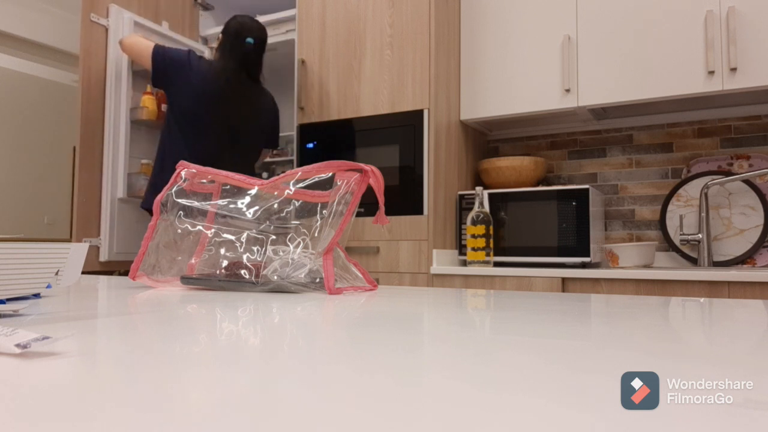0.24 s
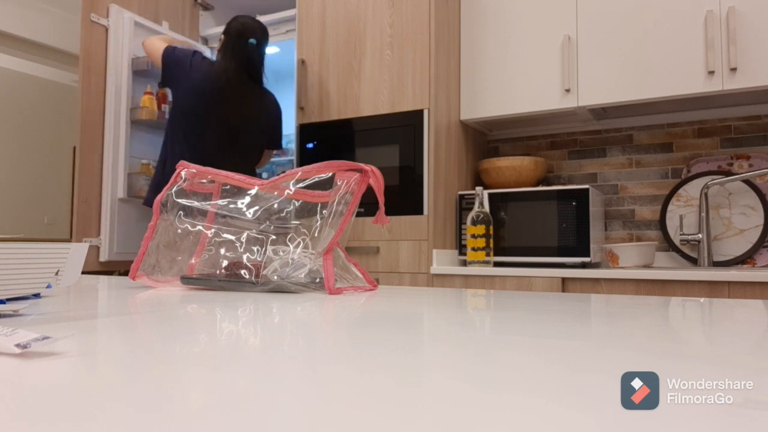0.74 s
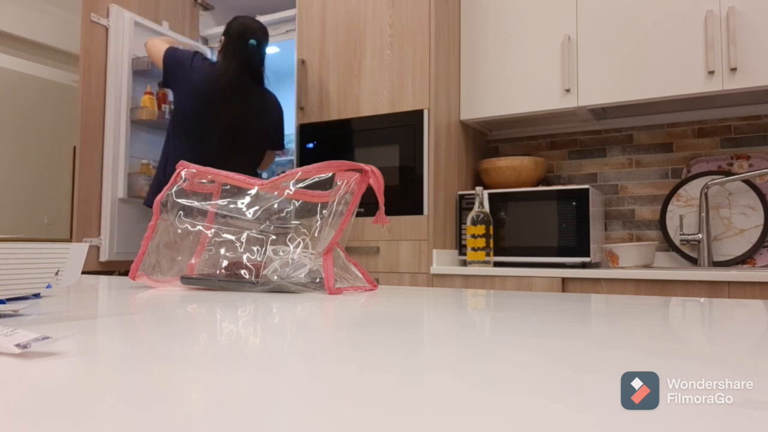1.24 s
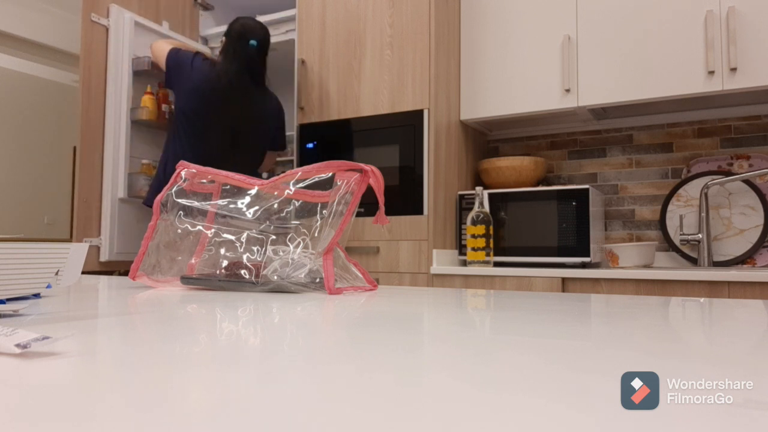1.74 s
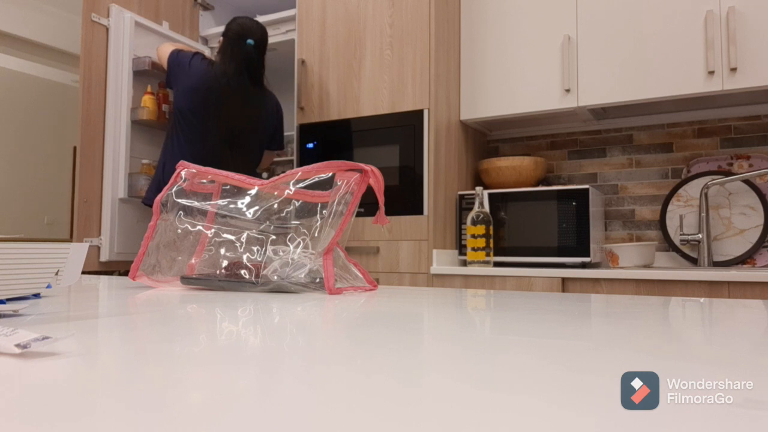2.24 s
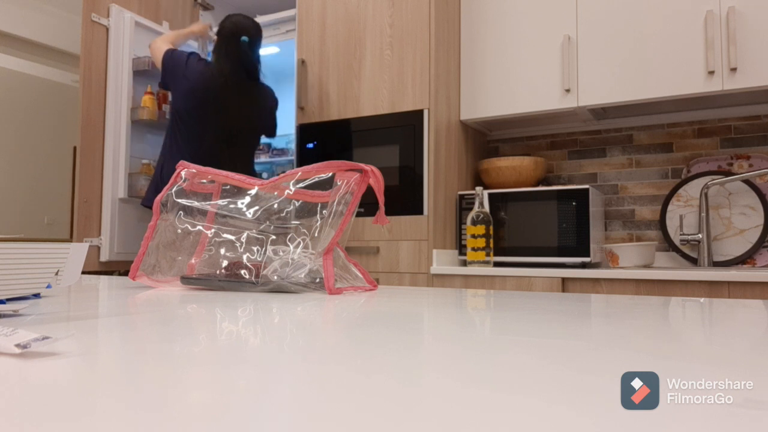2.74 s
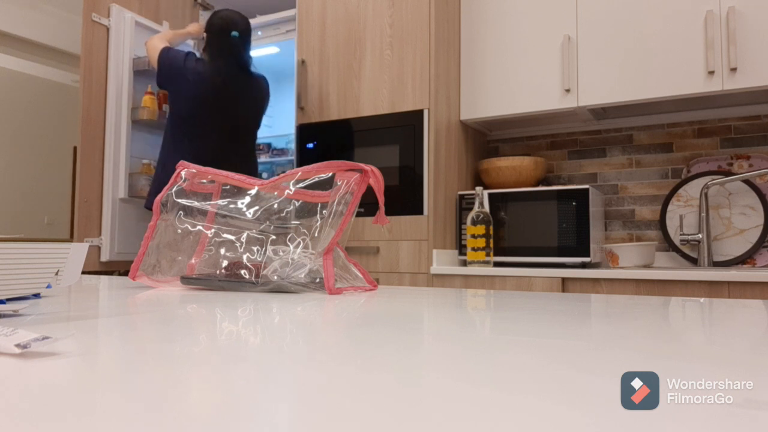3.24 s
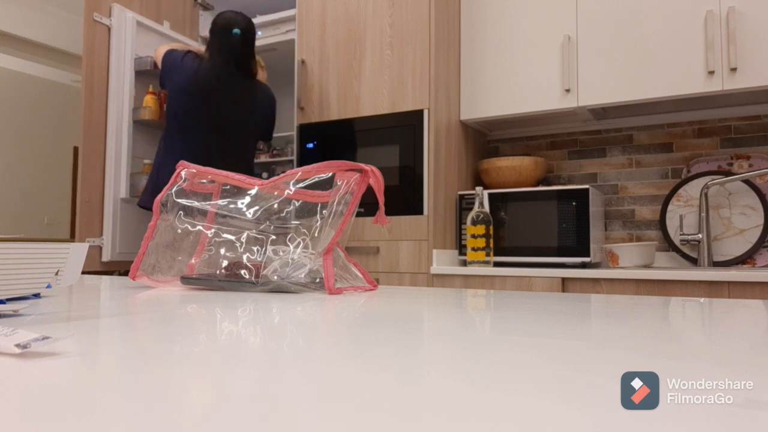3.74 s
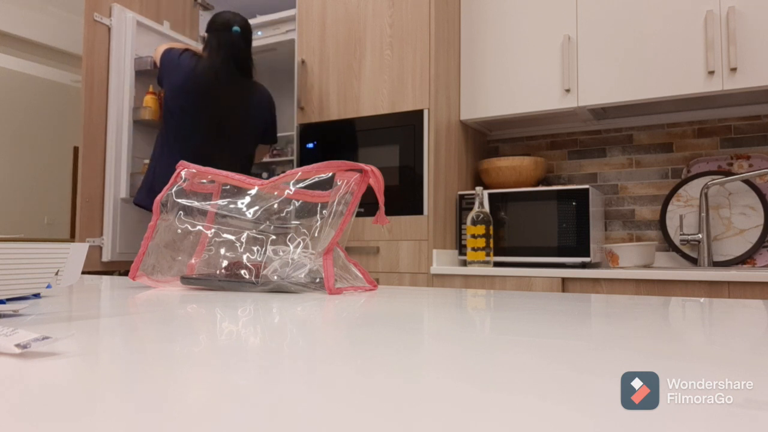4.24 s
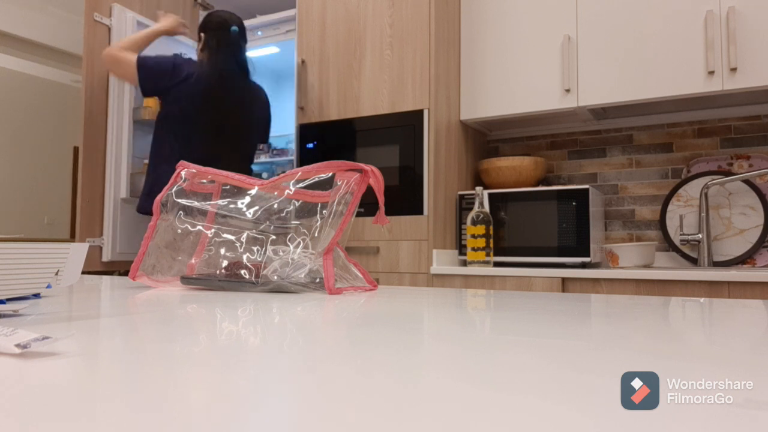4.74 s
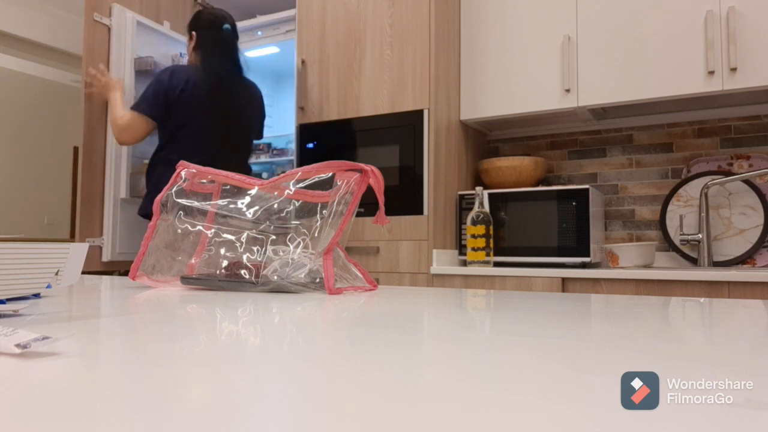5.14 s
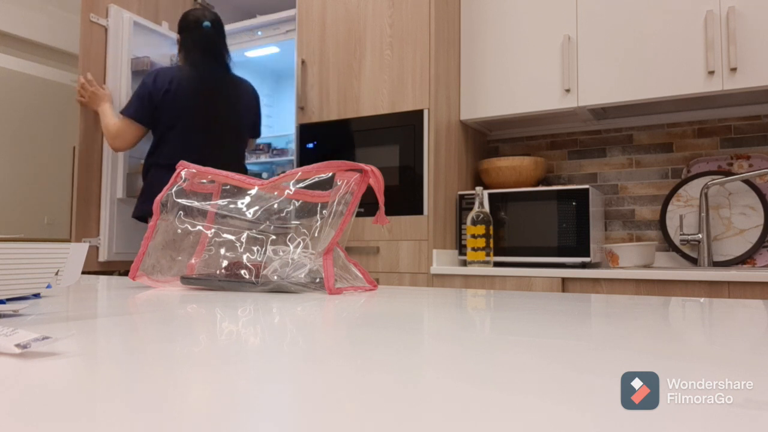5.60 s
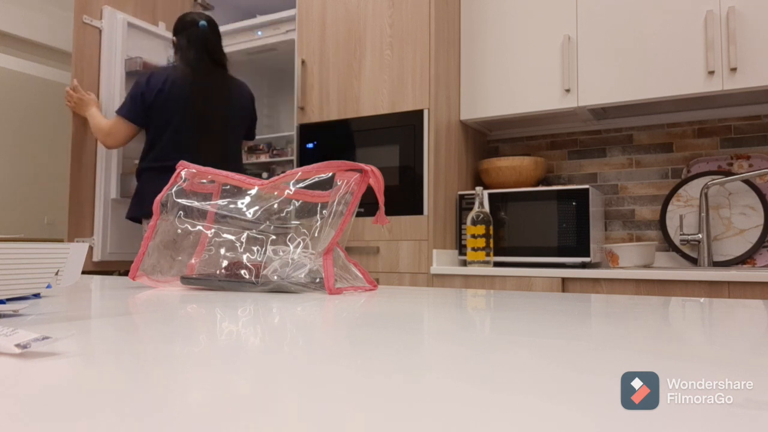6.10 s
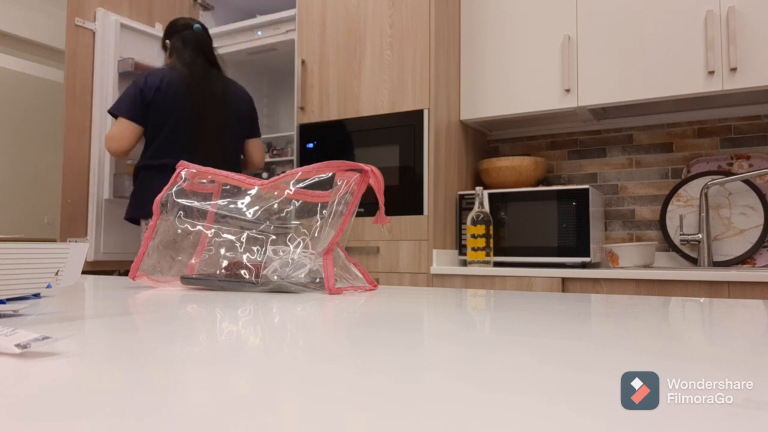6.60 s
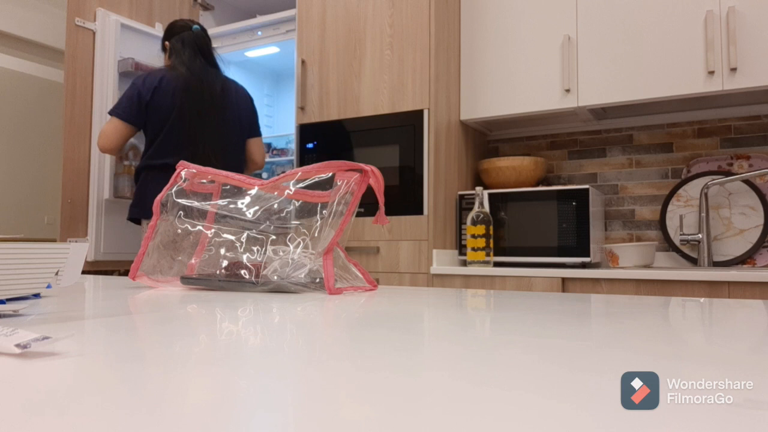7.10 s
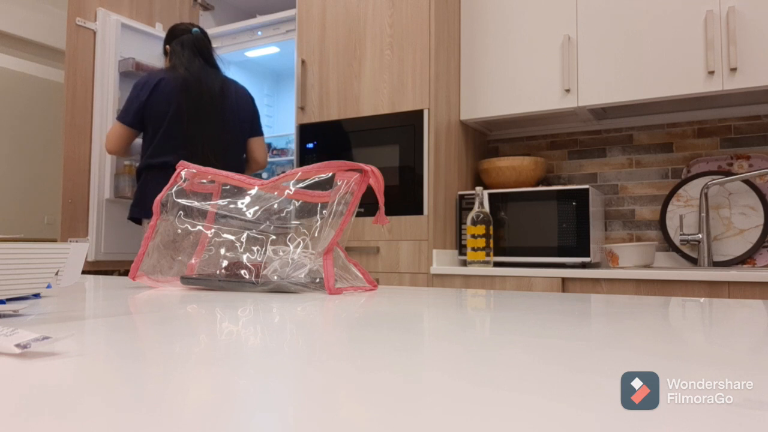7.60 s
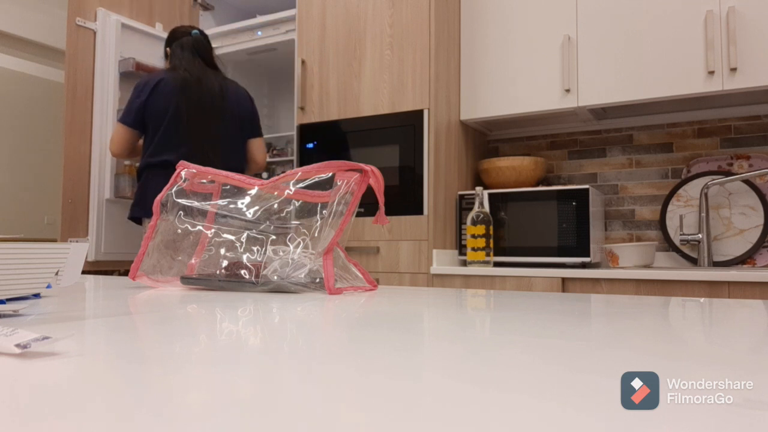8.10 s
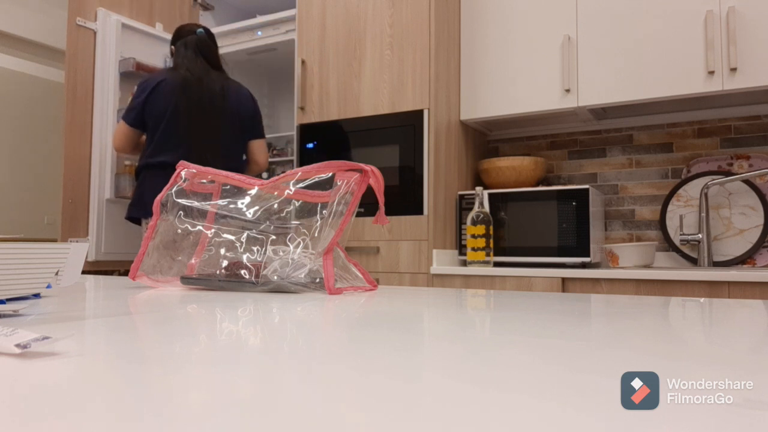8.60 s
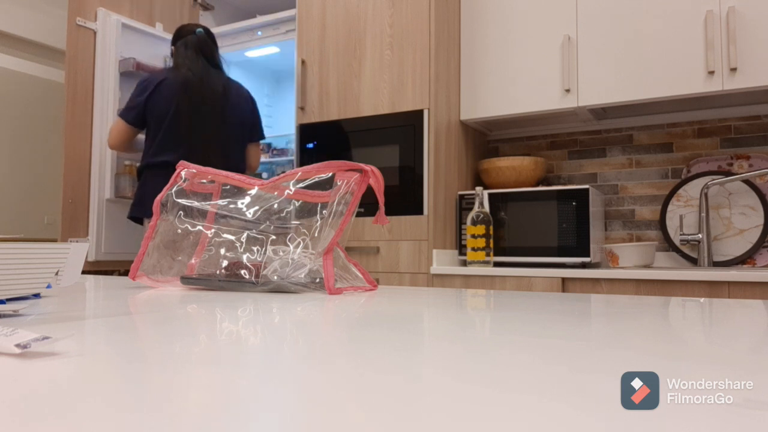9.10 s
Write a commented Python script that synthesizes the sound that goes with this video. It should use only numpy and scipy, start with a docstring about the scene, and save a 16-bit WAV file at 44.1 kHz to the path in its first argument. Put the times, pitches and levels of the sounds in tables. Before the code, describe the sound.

In a hard-walled home kitchen, someone rummages in an open refrigerator a few metres from the microphone. A dense clatter of plastic tubs, cartons and bottles fills the first two seconds, with thin plastic snaps and a brief squeak. Jars then clink and scrape, followed by scattered hollow knocks, a soft rustly pouch, a strong double thump late on and a final bottle knock. Room echo surrounds it all, over a very faint low compressor hum.

```python
"""A quick clatter of tubs, cartons and bottles is heard first, then sparser knocks and short scrapes over a faint hum:
someone rearranges an open refrigerator a few metres away across a hard-walled kitchen.
Knocks and slides are bursts of tiny impacts filtered by container, plastic shelf and cabinet resonances.
Two glass jars clink through damped modes, thin plastic snaps, and stuck plastic squeaks on a rising note.
Most of the sound arrives by way of the room's reverberation; compressor lines and low room noise lie beneath."""
import sys
import numpy as np
from scipy import signal
from scipy.fft import rfft, irfft, next_fast_len
from scipy.io import wavfile
from scipy.ndimage import uniform_filter1d, map_coordinates

SR = 44100
rng = np.random.default_rng(int(sys.argv[2]) if len(sys.argv) > 2 else 0)


def persist_wave(psi):
    """Save psi, clipped to +-1, as 16-bit WAV."""
    counts = np.round(np.clip(psi, -1, 1) * 32767).astype(np.int16)
    wavfile.write(sys.argv[1], SR, np.atleast_2d(counts).T)


N = 412335
BLOCK = 16384   # samples in one contact's filter


def knocks(graze_share=.4):
    """Impact excitation: each container grazes, then lands with its own force and hardness."""
    # containers set down or bumped: [t/s, container, force/dB, hardness/dB, settling/s]
    impacts = [ (.001, "tub", 7.5, 1, 0.0022), (0.135, "tub", 2.5, -7, 0.0039),
               (.316, "tray", 5.5, -8, 0.0037), (0.427, "tub", 20, 0.5, 0.0044),
               (.616, "rack", 11.5, 12, .003), (.632, "carton", 18.5, 5, 0.005), (.670, "tub", 18, 2, .002),
               (.984, "bottle", 17, 11.5, 0.0072), (1.004, "punnet", 24, -1.5, .005),
               (1.087, "carton", 15.5, 7, 0.0071), (1.101, "punnet", 17.5, -11.5, 0.006),
               (1.202, "tub", 19, 1, 0.0064), (1.237, "tub", 18, -4.5, 0.0063),
               (1.313, "tub", 13.5, -2.5, 0.0042), (1.505, "box", 3, 7.5, 0.0024),
               (1.549, "carton", 15, -21, 0.0031), (1.581, "carton", 8, 15, 0.0078),
               (1.639, "tub", 14, 5, .004), (1.656, "carton", 7.5, -16, 0.0029),
               (2.008, "jar", -2.5, -3.5, 0.0078), (2.034, "jar", 3.5, 5.5, 0.012),
               (2.083, "jar", 14.5, 5, .0016), (2.407, "jar", 4, -8, 0.0017),
               (2.552, "lid", -1, 5, 0.00282), (2.573, "lid", 0, 0, 0.0035), (2.637, "box", 1, 12.5, .002),
               (2.917, "lid", -7.5, -4.5, .005), (3.134, "carton", 5.5, -1, 0.0063),
               (3.525, "jar", -15.5, 8.5, 0.016), (3.761, "jar", 7, -13, 0.0085),
               (4.023, "jar", -1.5, 2, 0.0053), (4.174, "rack", -4, -7.5, 0.0046),
               (4.208, "box", -8.5, 14, 0.0099), (4.358, "punnet", 16.5, -0.5, .011),
               (4.551, "jar", 7.5, -0.5, 0.00216), (4.965, "tub", 2, -0.5, .011),
               (5.045, "bottle", 14, 10.5, 0.0053), (5.118, "tub", 5, -14, 0.0034),
               (5.197, "punnet", 3, -3.5, 0.0061), (5.319, "tub", 3.5, -2, 0.0049),
               (5.668, "bottle", 11, 3.5, 0.01), (5.739, "box", 7.5, -1.5, 0.0058),
               (5.787, "tub", 16.5, 9, 0.0047), (6.172, "rack", -3.5, 0.5, 0.0059),
               (7.049, "pouch", 5, 1.5, 0.016), (7.081, "pouch", 5, 0, 0.0047),
               (7.566, "tub", 7, 3.5, 0.011), (7.696, "pot", 25, -10, 0.0068),
               (7.743, "box", 24.5, -1, .01), (8.197, "box", 7.5, -13, .007),
               (8.53, "jar", -17, -20.5, .005), (8.637, "bottle", -15.5, -24.5, 0.0044),
               (9.159, "punnet", -3.5, -1, 0.0099), (9.233, "bottle", 15.5, 7.5, 0.012)]
    out = np.zeros(N)
    for s, container, force_db, hardness_db, settling in impacts:
        sound = contact(chatter(settling), container, force_db, hardness_db)
        add(out, s - graze_share * settling, sound)
    return out


def slides(slips_per_s=900, uneven_db=5):
    """Stick-slip friction: dense random clicks swell and fade as a container is pushed along."""
    # containers dragged along a shelf: [middle t/s, container, force/dB, hardness/dB, length/s]
    drags = [ (.386, "tray", -2, -1.5, 0.12), (.582, "rack", 6, 8, 0.094), (.897, "tub", -1.5, 14.5, 0.075),
             (.956, "box", 8, -1, 0.085), (1.35, "tub", 4, -9, 0.079), (2.37, "jar", -0.5, -1, 0.087),
             (3.02, "jar", -8.5, 9, 0.17), (3.105, "jar", -3, 17.5, 0.088),
             (3.199, "carton", -9.5, 26.5, 0.096), (3.858, "jar", -1, 7.5, .12),
             (4.323, "jar", -5.5, 10.5, 0.14), (4.471, "tub", 6.5, 4.5, .09), (4.883, "box", -14, 3, 0.13),
             (5.386, "tub", -1.5, 4, 0.1), (6.902, "pouch", -8.5, -8, .13),
             (7.001, "pouch", -12.5, -3, .13), (7.171, "pouch", -2, -9.5, .13),
             (8.84, "tub", -10, -17, 0.15)]
    out = np.zeros(N)
    for s, container, force_db, hardness_db, length in drags:
        size = int(length * SR)
        slips = rng.random(BLOCK) < slips_per_s / SR
        strength = rng.choice([-1, 1], BLOCK) * from_db(uneven_db * rng.standard_normal(BLOCK))
        clicks = (slips * strength)[:size]
        force = unit_energy(clicks * np.sqrt(np.hanning(size)))
        add(out, s - size / SR / 2, contact(force, container, force_db, hardness_db))
    return out


def nudges(count=44, force_db=-23, spread_db=2.0, hardness_db=-12, settling=0.028):
    """Weak, soft impacts: all the while the searching hand brushes against one container or another."""
    out = np.zeros(N)
    for k in range(count):
        s = (k + rng.random()) / count * (N - 1) / SR   # somewhere in the k-th equal slot
        container = rng.choice(["carton", "bottle", "box"])
        nudge_db = force_db + spread_db * rng.standard_normal()
        add(out, s, contact(chatter(settling), container, nudge_db, hardness_db))
    return out


def chatter(settling, uneven_db=5):
    """Broadband excitation: a quick flurry of uneven tiny impacts that excites all pitches alike."""
    age = np.arange(BLOCK // 2) / SR / settling
    swell = age * np.exp(-age)
    flurry = rng.standard_normal(len(age)) * from_db(uneven_db * rng.standard_normal(len(age)))
    for _ in range(2):   # shape in time, then flatten the spectrum
        spectrum = rfft(flurry * swell, BLOCK)
        flurry = irfft(spectrum / np.abs(spectrum))[:len(age)]
    return unit_energy(flurry * swell ** .25)


def contact(force, container, force_db, hardness_db):
    """Source-filter principle: a container has its own thud and hollow note; hardness adds clack and tick."""
    # what is handled, by name: [hollow note f/Hz, note over the rest/dB, thud/dB, clack/dB, tick/dB]
    containers = { "carton": (316.5, 8, -1.5, -14.5, -37), "tray": (1450, 8, 5, -4.5, -37),
                  "pouch": (403.5, 10.5, -1, -17.5, -33), "bottle": (437.5, 9, -5.5, -9.5, -35.5),
                  "tub": (557.5, 9, 0.5, -9.5, -31), "box": (699, 6.5, -1, -9.5, -30.5),
                  "jar": (806, 8.5, -9, -6.5, -26.5), "punnet": (590, 10, -15, -9, -27.5),
                  "pot": (960, 8.5, -1.5, 1, -9.5), "lid": (1323.5, 12.5, -18.5, -9.5, -27),
                  "rack": (2150, 4.5, -12, -5, -31.5)}
    # colour of a contact on plastic shelving: [f/Hz, level/dB]
    shelf_colour = [(30, -18.5), (60, -9), (100, -4.5), (170, -1.5), (280, -3), (600, 0.5), (1000, -1),
                    (1500, 1), (2400, -5.5), (3200, -7), (5000, 3), (8000, -3), (13000, -7.5),
                    (16000, -9.5)]
    note_hz, note_db, thud_db, clack_db, tick_db = containers[container]
    clack_db = clack_db + 0.45 * hardness_db   # the clack takes a share of the hardness
    tick_db = tick_db + hardness_db            # the tick takes all of it
    hz = np.fft.rfftfreq(BLOCK, 1 / SR)
    tone = [(190, thud_db), (380, 0.012), (950, 0.017), (1700, clack_db), (2700, clack_db), (5000, tick_db)]
    note_width_hz = 55.5 + 0.07 * note_hz
    detuning = 2 * (hz - note_hz) / note_width_hz
    hollow_db = 10 * np.log10(1 + (from_db(note_db) ** 2 - 1) / (1 + detuning ** 2))
    level_db = force_db + at_hz(tone, hz) + at_hz(shelf_colour, hz) + hollow_db + wall_modes(hz)
    return coloured(force, level_db)


def wall_modes(hz, spacing_hz=90):
    """Modal scatter: random peaks and dips in dB above 450 Hz for the walls' damped resonances."""
    depth_db = at_hz([(450, 0), (900, 3), (4000, 2.5), (9000, 1.5)], hz)
    return depth_db * map_coordinates(rng.standard_normal(BLOCK), [hz / spacing_hz], order=1)


def cabinet(force, ring_db=2):
    """Sympathetic resonance: every contact also sets the shelves and the cabinet ringing."""
    # resonances of cabinet, shelves and racks: [f/Hz, width/Hz, level before ring_db/dB]
    cabinet_modes = [(100.3, 2.4, 9.5), (152, 25, -3), (264, 3, -2.5), (316, 23, 3.5), (452.7, 6.6, -2.5),
                     (563.7, 6.6, 0.5), (700, 13, -3), (815, 29, -9), (890, 11, -9), (1083, 25, -3),
                     (1204, 21, -6), (1560, 2.2, -10.5), (2040, 95, -11.5), (2270, 22, -3), (2473, 5.7, -5)]
    return force + from_db(ring_db) * resonate(force, cabinet_modes)


def clinks():
    """Modal ringing: jars grate in short flurries; their contents damp all but one glass mode."""
    # jar grating against jar: [t/s, force/dB, settling/s]
    gratings = [(2.424, 0, 0.0097), (2.445, -13, 0.003), (2.485, -16, 0.01)]
    # ring of the glass: [f/Hz, width/Hz, level/dB]
    glass_modes = [(1650, 28, 12), (1790, 57, 13), (1870, 94, 17), (2700, 74, 0), (3350, 59, 3),
                   (4160, 210, 4), (4430, 4.5, 17), (4490, 53, 15.5), (5850, 300, -1.5), (6260, 26, 5),
                   (7580, 940, -4.5), (8200, 54, 1), (9230, 96, 1), (10800, 1100, -7.5), (11900, 670, -3),
                   (14400, 1000, -14)]
    return resonate(flurries(gratings), glass_modes)


def snaps(edge_hz=10000):
    """High-pass radiation: flexing film and thin tub walls crackle only at the very top of the treble."""
    # thin plastic snapping under the fingers: [t/s, force before the high-pass/dB, settling/s]
    flexings = [(0.424, -29, 0.0036), (0.617, -17.5, 0.0075), (0.905, -16.5, 0.009), (0.979, -2, 0.0037),
                (1.194, -15.5, 0.0031), (1.427, -26, 0.0023), (1.634, -12, 0.0012), (6.91, -36, 0.0072)]
    high_pass = signal.butter(2, edge_hz, "high", fs=SR, output="sos")
    return signal.sosfilt(high_pass, flurries(flexings) + 1e-18)


def squeaks(width_hz=260, rise=1.25):
    """Frictional oscillation: sticking plastic gives a rough note that rises as the pull speeds up."""
    # plastic pulled free of a rack: [start t/s, length/s, first pitch f/Hz, force/dB]
    pulls = [(0.552, 0.065, 2350, -18), (2.935, 0.17, 1950, -26.5)]
    out = np.zeros(N)
    low_pass = signal.butter(2, width_hz / 2, fs=SR, output="sos")
    for s, length, hz, force_db in pulls:
        size = int(length * SR)
        phase = 2 * np.pi * np.cumsum(np.linspace(hz, rise * hz, size)) / SR
        grip = signal.sosfilt(low_pass, rng.standard_normal(BLOCK))[-size:]   # slow noise roughens the note
        squeak = unit_energy(grip * np.sin(phase) * np.sqrt(np.hanning(size)))
        add(out, s, from_db(force_db) * squeak)
    return out


def kitchen(x, early_t60=0.29, build_s=0.0029, build_cycles=0.37, right_db=-1, lag_s=0.00013):
    """Room impulse response: direct sound from the left, early reflections off counter and cupboards, tail."""
    # reverberation time: [f/Hz, t60/s]
    room_t60 = [(60, 0.65), (150, .75), (300, 0.77), (700, 0.91), (1500, 0.65), (2500, 0.65), (5000, 0.58),
                (8000, 0.6), (14000, 0.15)]
    # early reflections over the start of the tail: [f/Hz, level/dB]
    early_colour = [(100, -8), (250, 6), (600, 10.5), (2000, 0.5), (6000, 4), (13000, 6.5)]
    # direct sound re the whole reverberation, before evening: [f/Hz, level/dB]
    direct_colour = [(100, -14.5), (300, -12), (700, -5), (2500, -7.5), (7000, -5), (13000, -11.5)]
    t, response = np.arange(SR) / SR, 0
    for hz, band in diffuse_bands(SR):
        tail = from_db(-60 * t / at_hz(room_t60, hz))
        early = from_db(at_hz(early_colour, hz) - 60 * t / early_t60)
        build = 1 - np.exp(-t / (build_s + build_cycles / hz))   # low notes fill the room more slowly
        response = response + band * unit_energy(np.hypot(tail, early) * build)
    response = unit_energy(response)
    direct = coloured(np.ones(1), at_hz(direct_colour, np.fft.rfftfreq(BLOCK, 1 / SR)))
    add(response[0], 0, direct)
    add(response[1], lag_s, from_db(right_db) * direct)
    return signal.oaconvolve(x[None], evened(response), axes=1)[:, :N]


def evened(response, width_bins=50):
    """Spectral smoothing: level out a stereo response's broad humps, keep its fine resonances."""
    spectrum = rfft(response, 2 * SR)   # bins 0.5 Hz apart
    power = uniform_filter1d(np.mean(np.abs(spectrum) ** 2, axis=0), width_bins)
    return irfft(spectrum / np.sqrt(power + 1e-12))[:, :SR]


def diffuse_bands(size):
    """Diffuse-field coherence: half-octave bands of partly alike stereo noise, as (Hz, band)."""
    # likeness of the two channels, clipped to +-0.99: [f/Hz, correlation -1..1]
    likeness = [(60, 1), (150, 0.94), (300, 0.84), (550, 0.66), (1000, 0), (2000, 0), (5000, 0.037),
                (14000, 0)]
    # left minus right: [f/Hz, level/dB]
    lean = [(50, 13.5), (130, 9.5), (260, 5), (550, 6.5), (1000, 2), (2000, 6.5), (4000, 2), (14000, 1.9)]
    hz = np.fft.rfftfreq(size, 1 / SR)
    mid, side = rfft(rng.standard_normal((2, size)))
    alike = np.clip(at_hz(likeness, hz), -.99, .99)
    sign = np.array([[1], [-1]])   # left, right
    field = (np.sqrt(1 + alike) * mid + sign * np.sqrt(1 - alike) * side) / np.sqrt(2)
    field = field * from_db(sign * at_hz(lean, hz) / 2)
    centres = 22 * 2 ** (np.arange(20) / 2)
    for centre, one_band in zip(centres, np.eye(len(centres))):
        yield centre, irfft(field * at_hz(np.c_[centres, one_band], hz), size)


def background(air_db=-63.5, hum_lean_db=3):
    """Stationary noise and steady sinusoids: low room noise and the lines of the compressor."""
    # spectral shape of the still kitchen, whose rms is then set to air_db: [f/Hz, relative level/dB]
    air_colour = [(22, -43.5), (32, -25.5), (46, -6.5), (66, -16), (95, -3.5), (130, -5.5), (180, -11.5),
                  (330, -14), (620, -30), (1100, -34), (1700, -39.5), (2500, -45), (3500, -39.5),
                  (6500, -48.5), (15000, -40)]
    # compressor: [f/Hz, rms level before the lean to the left/dB]
    hum_lines = [(97, -74.5), (296, -78), (501, -89), (603, -87.5)]
    bands = diffuse_bands(next_fast_len(N, True))
    air = sum(from_db(at_hz(air_colour, hz)) * band for hz, band in bands)[:, :N]
    t, hum = np.arange(N) / SR, np.zeros(N)
    for hz, db in hum_lines:
        hum += np.sqrt(2) * from_db(db) * np.sin(2 * np.pi * (hz * t + rng.random()))
    return from_db(air_db) * air / np.std(air) + hum * from_db([[hum_lean_db], [-hum_lean_db]])


def flurries(events):
    """Superposition: one chatter for each (s, force dB, settling s) on a single force track."""
    force = np.zeros(N)
    for s, force_db, settling in events:
        add(force, s, from_db(force_db) * chatter(settling))
    return force


def resonate(force, modes):
    """Modal synthesis: parallel two-pole resonances, each with the given level at its top."""
    out = np.zeros(N)
    for hz, width, db in modes:
        r = np.exp(-np.pi * width / SR)   # pole radius from the bandwidth
        poles = [1, -2 * r * np.cos(2 * np.pi * hz / SR), r * r]
        ring = signal.lfilter([1, 0, -1], poles, force + 1e-18)
        out += from_db(db) * (1 - r * r) / 2 * ring
    return out


def coloured(x, db):
    """Minimum-phase filtering: a causal filter with the given level at each frequency of a block."""
    cepstrum = irfft(np.log(from_db(db)))
    cepstrum[1:BLOCK // 2] *= 2   # fold the cepstrum onto positive time
    return irfft(rfft(x, BLOCK) * np.exp(rfft(cepstrum[:BLOCK // 2], BLOCK)))


def from_db(db):
    """Level to amplitude ratio: decibels to gain."""
    return 10 ** (np.asarray(db) / 20)


def unit_energy(x):
    """Energy normalisation: the squares of each channel add up to about one."""
    return x / np.sqrt(np.mean(np.sum(x ** 2, axis=-1)) + 1e-20)


def at_hz(points, hz):
    """Logarithmic pitch axis: read a (Hz, value) table by log frequency."""
    points = np.array(points)
    return np.interp(np.log(np.maximum(hz, 1)), np.log(points[:, 0]), points[:, 1])


def add(track, s, sound):
    """Linear superposition: mix a sound into the track from time s on."""
    start = max(round(s * SR), 0)
    track[start:start + len(sound)] += sound[:N - start]


def scene():
    """Superposition of sources: the refrigerator's clatter in the kitchen, over the background."""
    handling = cabinet(knocks() + slides() + nudges())
    return kitchen(handling + squeaks() + clinks() + snaps()) + background()


def record(dry):
    """Band limiting: an elliptic low-pass cuts the top steeply."""
    return signal.sosfilt(signal.ellip(12, .2, 80, 15850, fs=SR, output="sos"), dry)   # cutoff in Hz


dry = scene()
out = record(dry)
persist_wave(out)
```